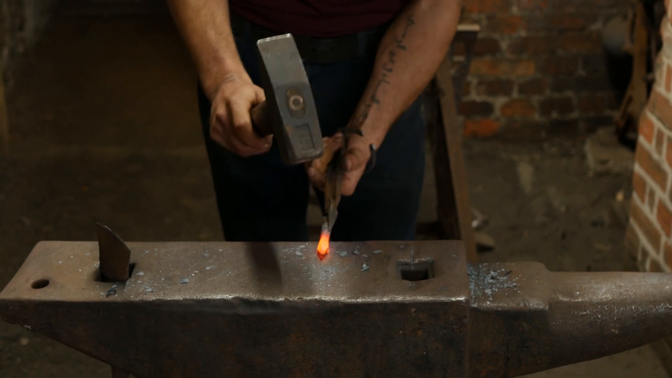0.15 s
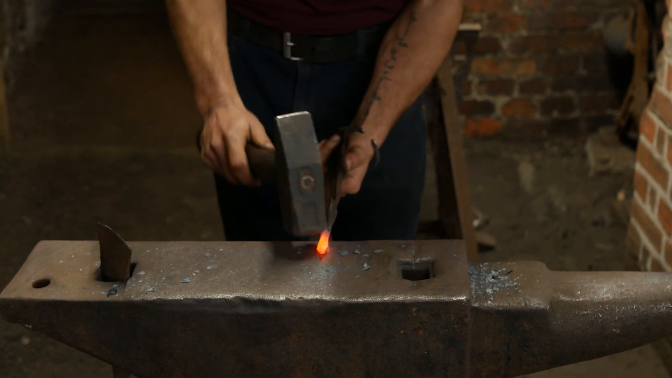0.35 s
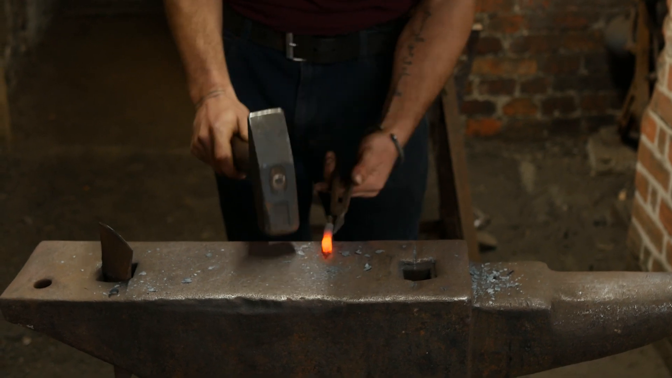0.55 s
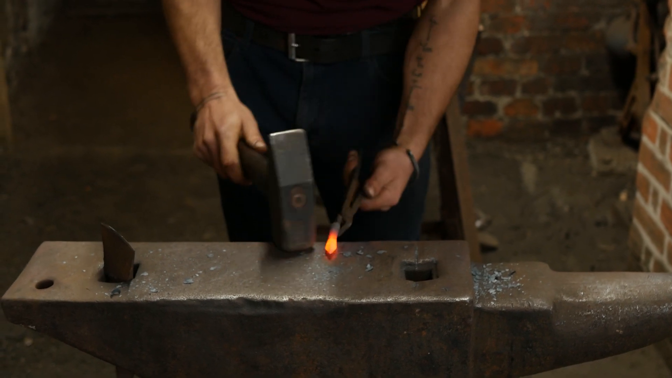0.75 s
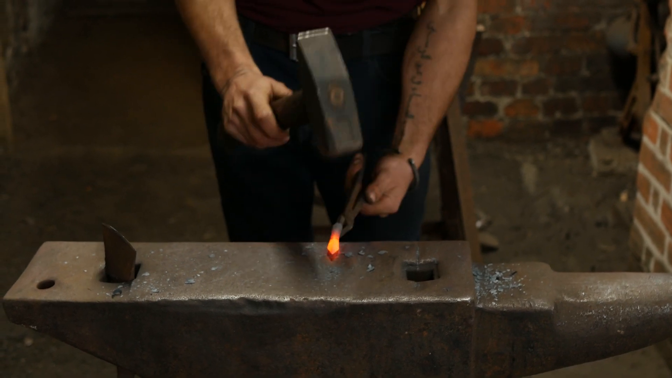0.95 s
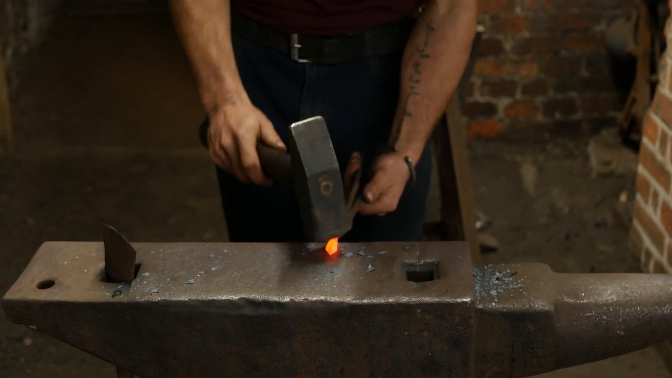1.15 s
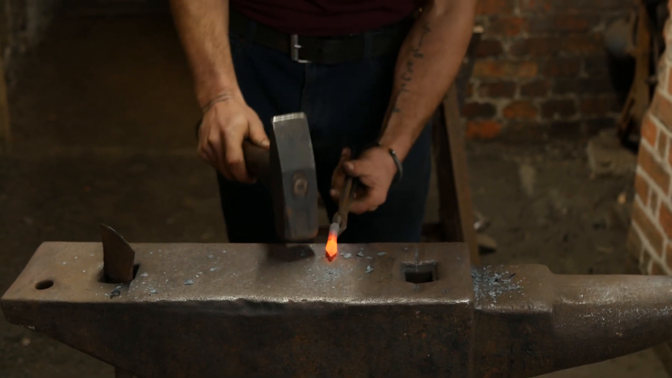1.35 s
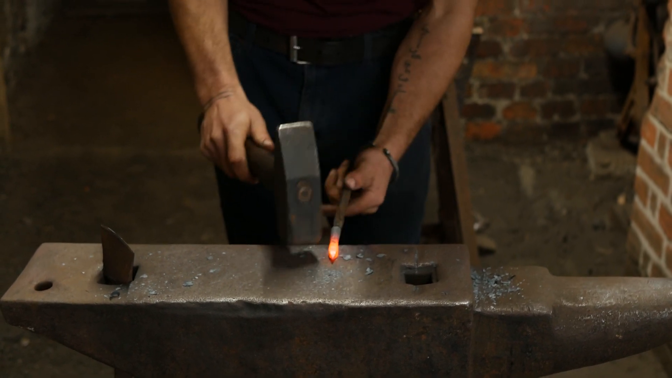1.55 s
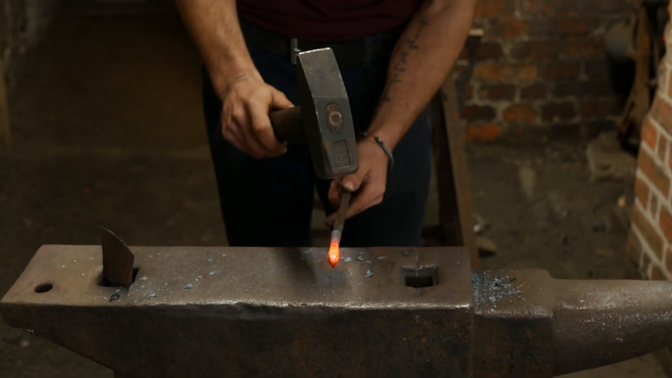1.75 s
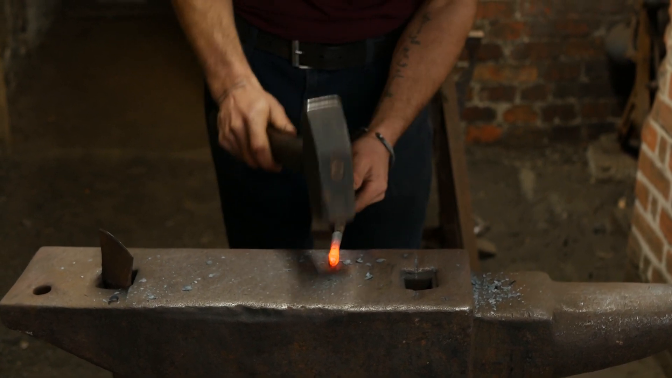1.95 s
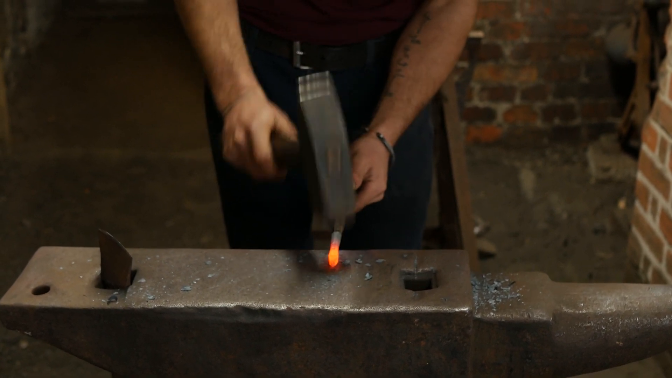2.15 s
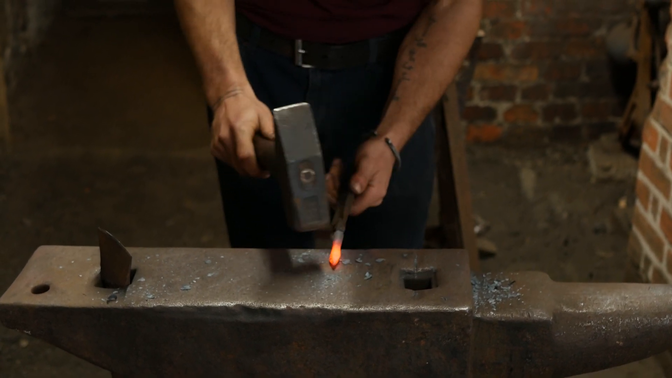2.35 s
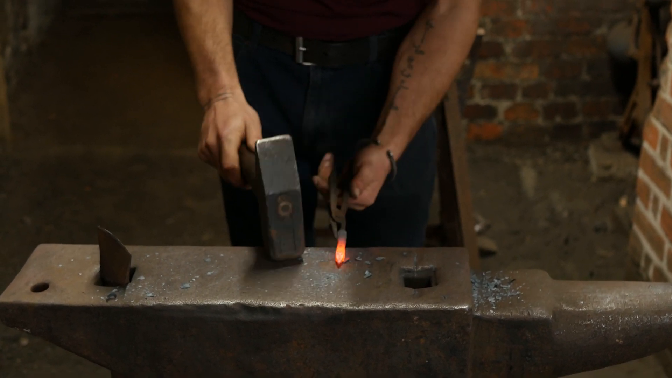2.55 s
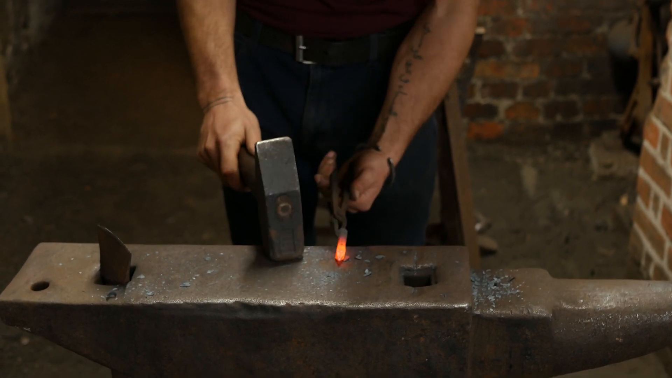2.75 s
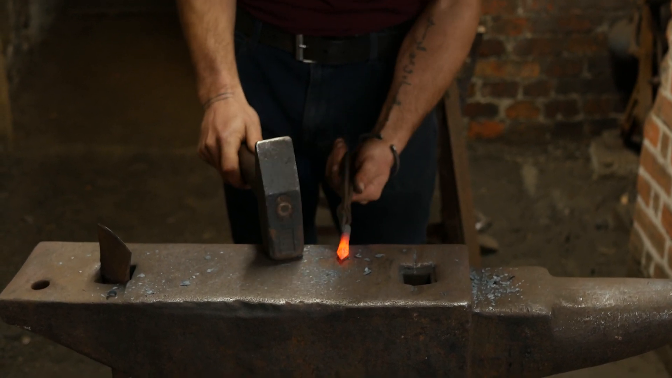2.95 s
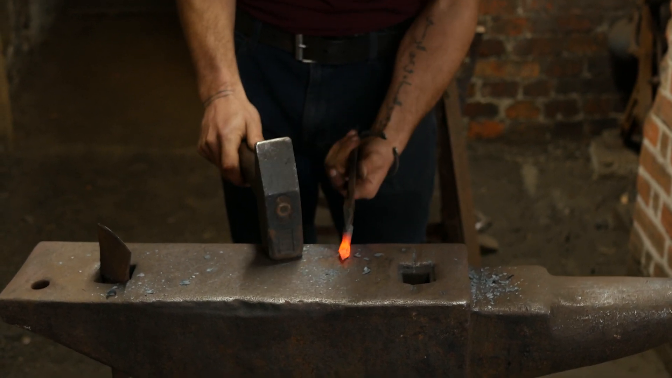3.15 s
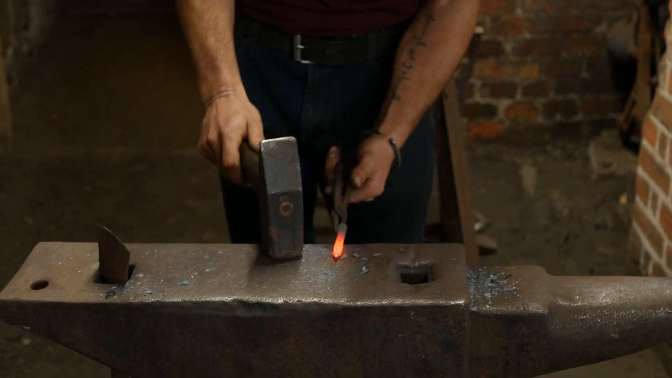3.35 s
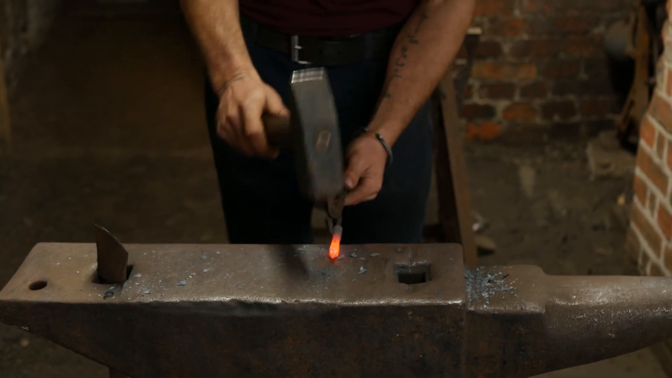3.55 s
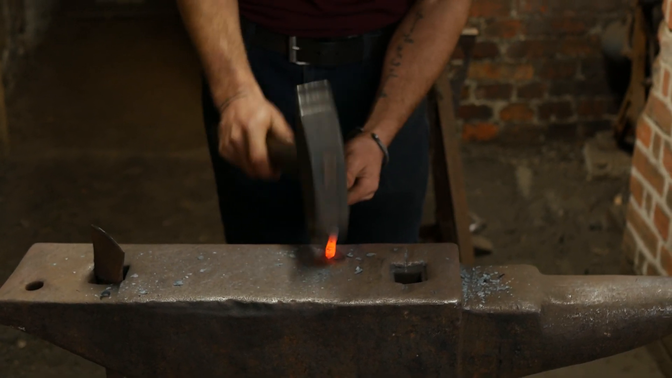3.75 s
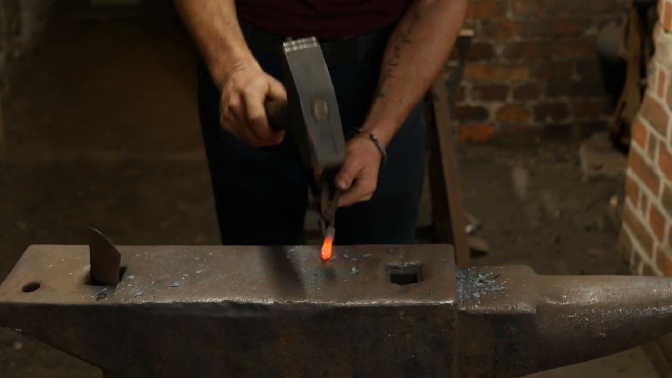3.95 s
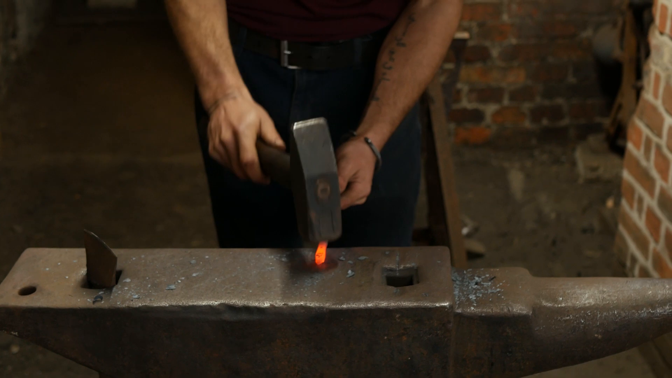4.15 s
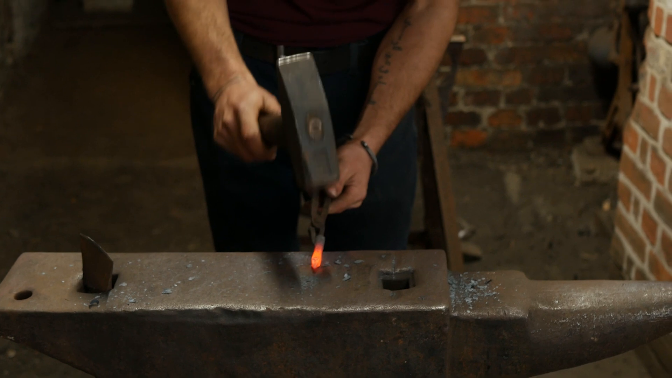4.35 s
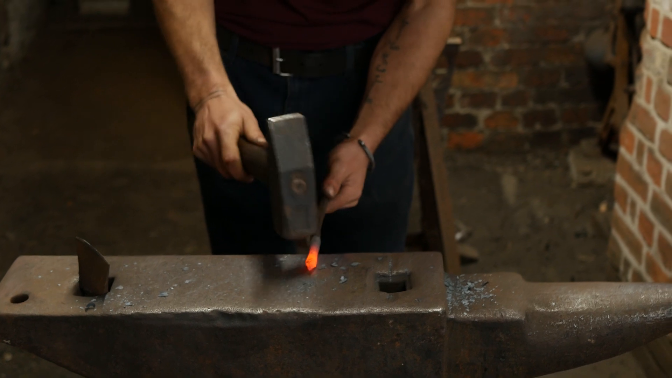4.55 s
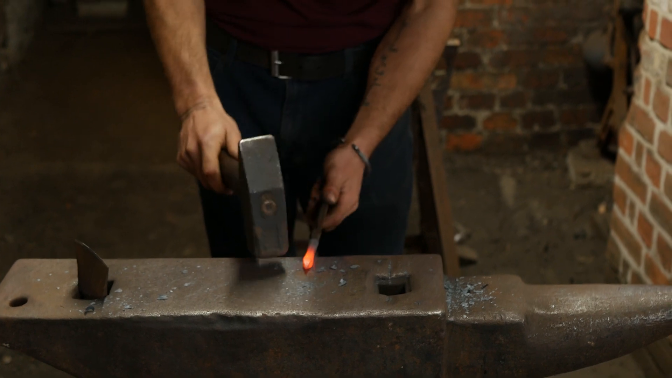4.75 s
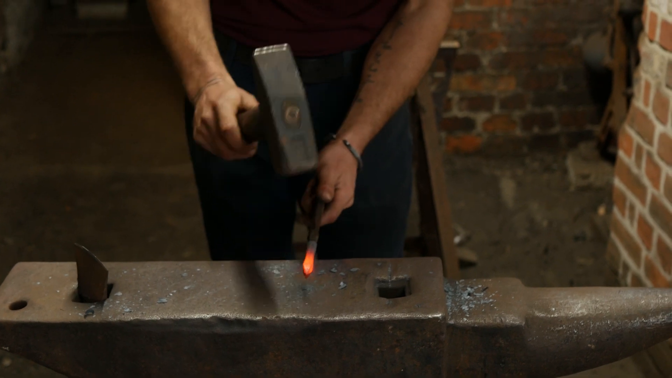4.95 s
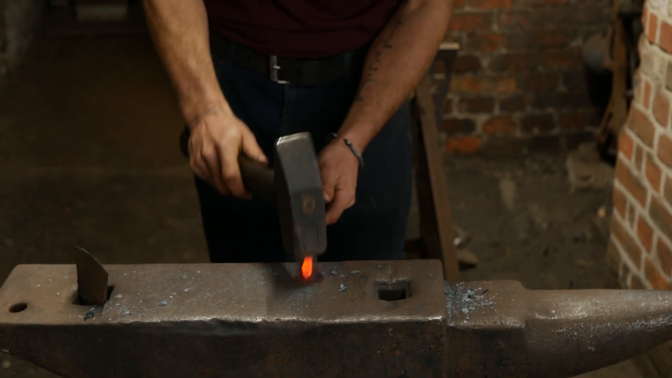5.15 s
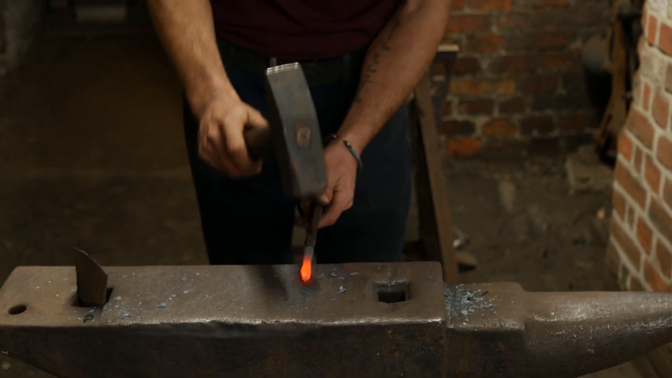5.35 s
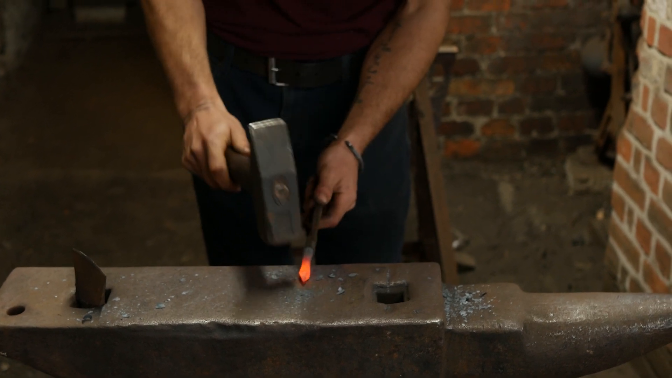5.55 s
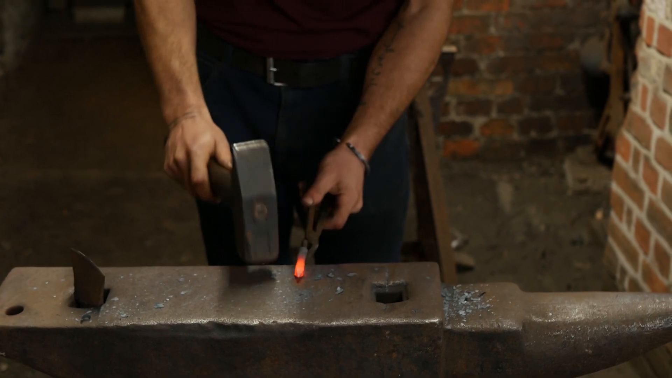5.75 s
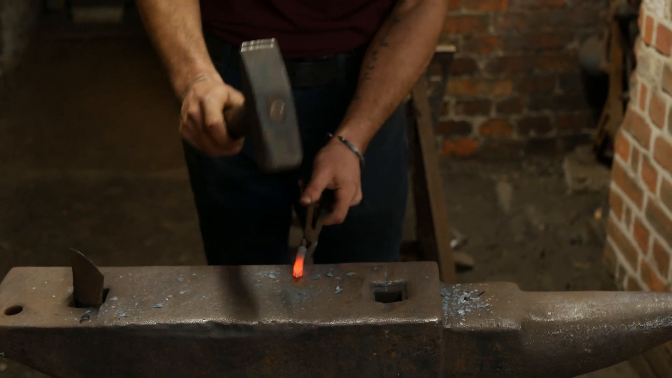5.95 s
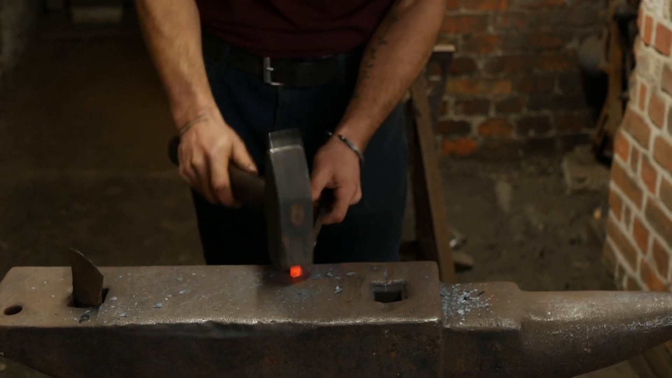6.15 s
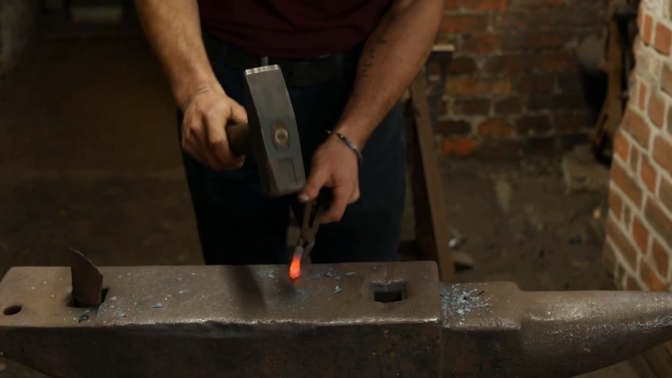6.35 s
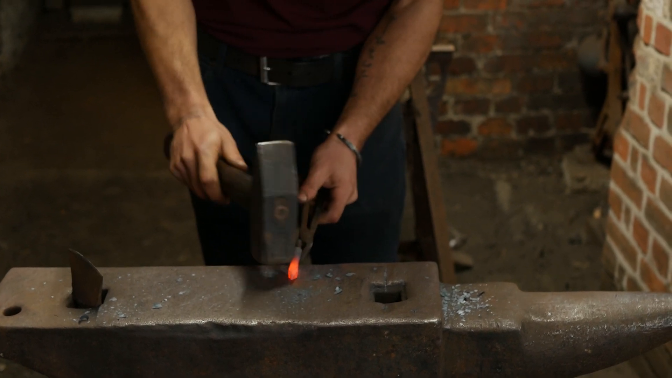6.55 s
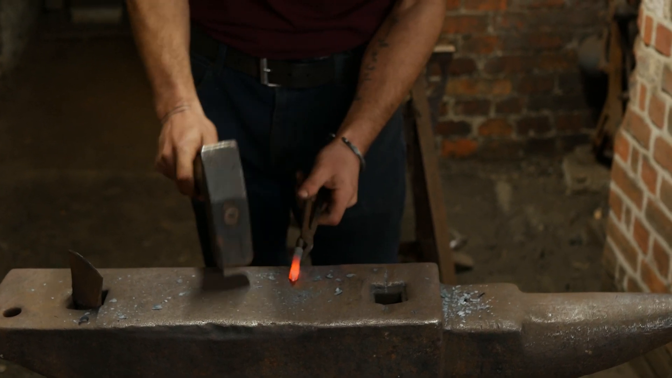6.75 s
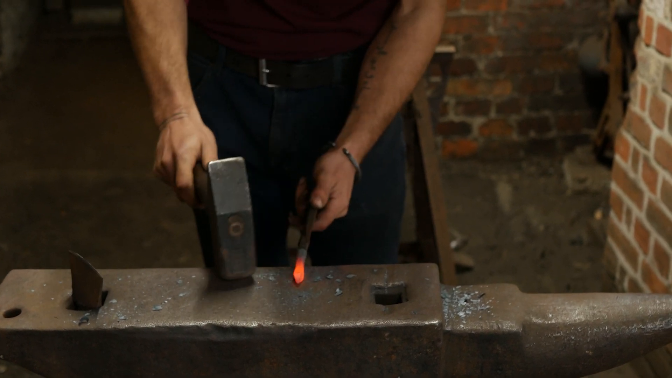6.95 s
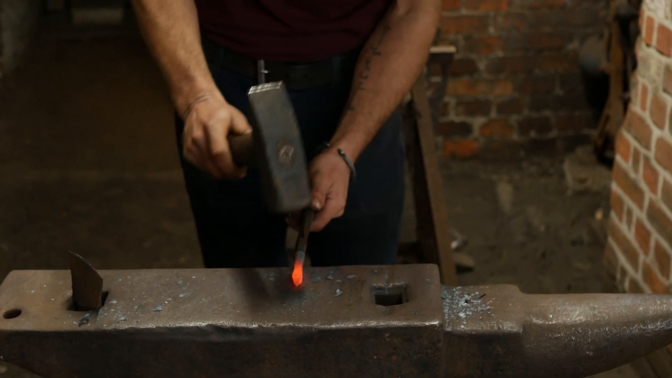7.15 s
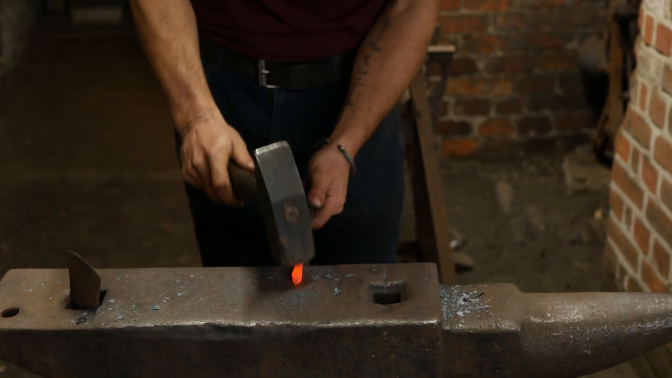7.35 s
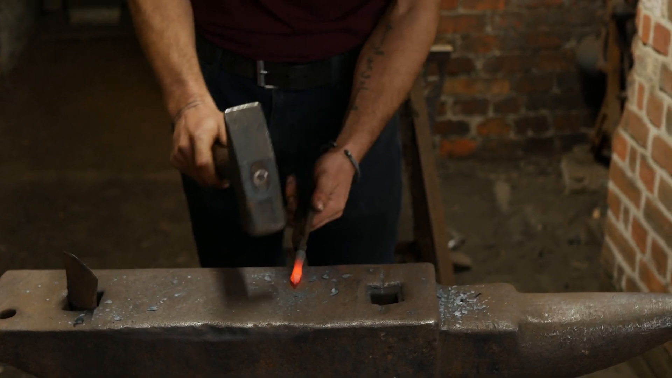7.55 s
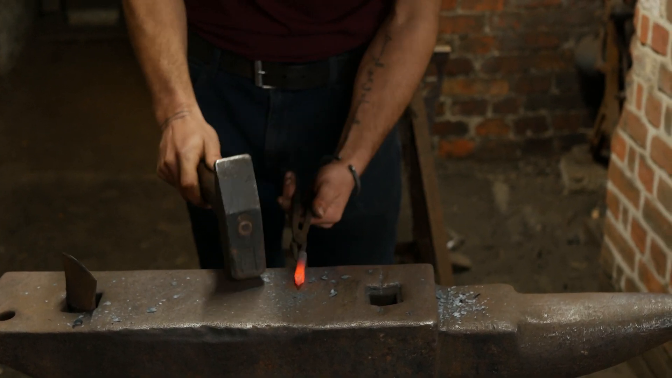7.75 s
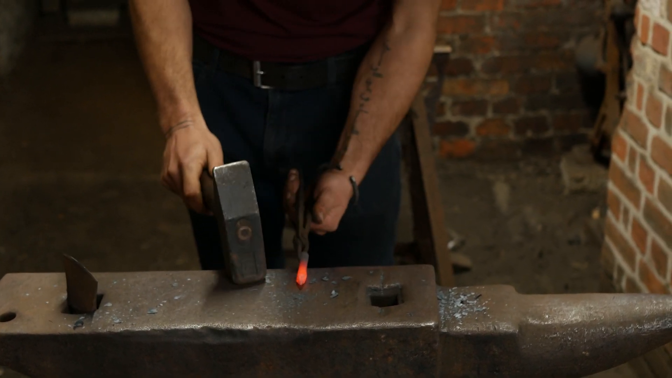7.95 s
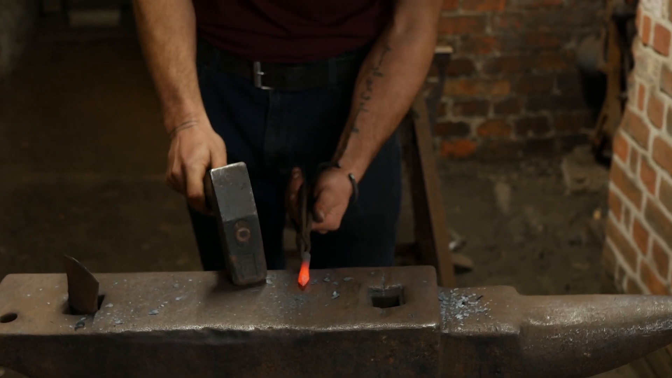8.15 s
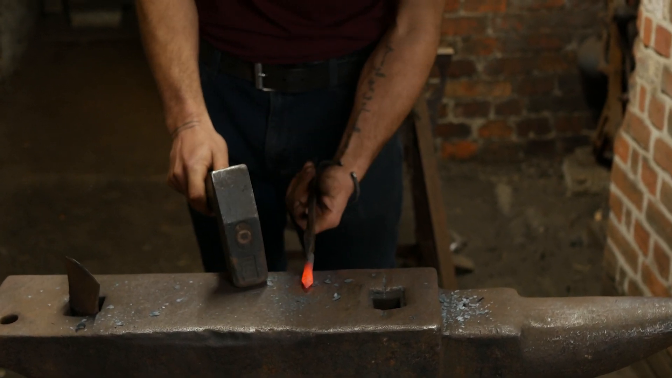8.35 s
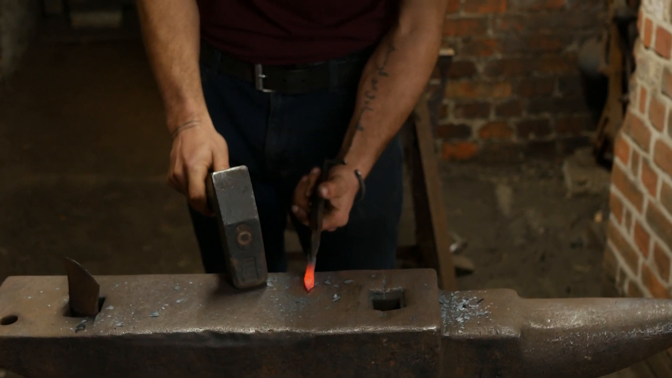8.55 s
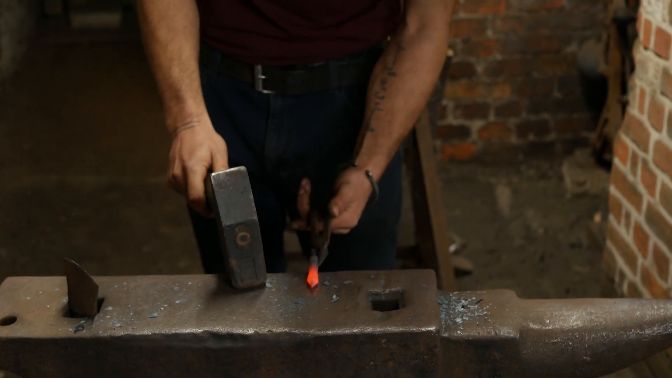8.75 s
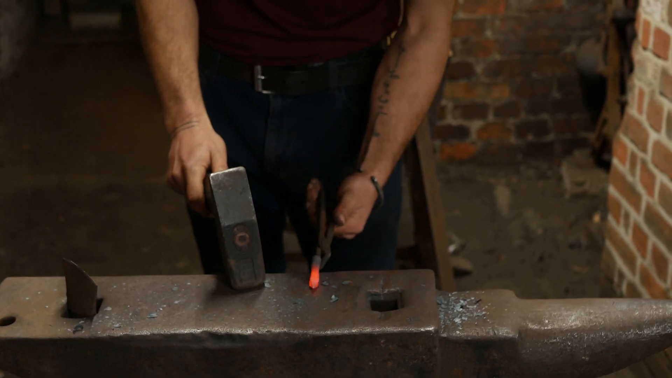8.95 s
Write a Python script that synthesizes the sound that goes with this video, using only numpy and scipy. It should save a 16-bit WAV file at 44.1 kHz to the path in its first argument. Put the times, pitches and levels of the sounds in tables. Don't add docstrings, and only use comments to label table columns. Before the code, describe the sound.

Hard, bright hammer blows ring on a steel anvil in steady rhythm, overloading the close microphone in a brick forge, with brief pauses.

```python
import sys
import numpy as np
from scipy import signal
from scipy.fft import rfft, irfft
from scipy.io import wavfile

SR = 44100
rng = np.random.default_rng(int(sys.argv[2]) if len(sys.argv) > 2 else 0)


def rack_gain(trim_db):
    fader = np.asarray(trim_db, float)
    return 10 ** (fader / 20)


def digitize_waveform(pressure):
    field = np.atleast_2d(pressure).T
    bounded = np.clip(field, -1, 1)
    quanta = np.round(bounded * 32767).astype(np.int16)
    wavfile.write(sys.argv[1], SR, quanta)


N = 400847

# (time [s], level [dB])
TRAFFIC_COLOUR = [(12, -45), (20, -14), (48, -2.5), (80, -14), (114, -6), (145, -13), (234, -8),
                  (304, -11.5), (342, -19), (501, -15.5), (668, -21), (1000, -14.5), (2540, -32),
                  (6000, -41), (7800, -66.5), (13200, -120)]
TRAFFIC_SWELL = [(0, -64), (1.2, -61.5), (3.4, -61.5), (3.9, -57.5), (5.2, -64.5), (7.3, -64.5), (8.3, -63),
                 (9.09, -57.5)]
# (frequency [Hz], level [dB per Hz])
RUSTLE_COLOUR = [(4000, -15), (5900, -10), (6300, -4), (7500, -4), (7900, -4.5), (11900, -3), (12400, -11),
                 (15500, -12), (16200, -36)]
# (time [s], length [s], added rustle [dB])
STIRS = [
    (2.583, 0.17, 5),
    (2.57, 1.7, 4.5),
    (7.706, 1.34, 7),
    (4.135, 0.11, 9),
    (7.88, 0.22, 4.5),
    (8.66, 0.67, 7),
]

# (time [s], lowest pitch [Hz], level [dB])
CHIRPS = [(1.48, 3080, -67.5), (1.72, 3100, -72.5), (1.866, 3000, -69), (1.98, 2920, -65.5),
          (7.674, 3220, -65.5), (7.80, 3110, -61), (7.912, 3050, -60), (8.043, 2880, -57.5),
          (8.183, 2820, -60)]
# (time [s], length [s], middle pitch [Hz], level [dB])
SLIDES = [(2.259, 0.12, 3100, -64), (2.563, 0.068, 3350, -67), (8.298, .04, 4630, -71),
          (8.327, 0.077, 3020, -56), (8.527, 0.043, 5430, -66), (8.558, 0.058, 3240, -58),
          (8.613, 0.076, 3140, -53), (8.715, .12, 2620, -59.5)]
# (frequency [Hz], level [dB per Hz])
HOARSENESS = [(20, 0), (250, 0), (500, -15), (900, -80)]

# (time [s], peak level [dB], pitch [Hz])
TICKS = [(2.6114, -61.5, 9400), (2.9442, -61.5, 6200), (3.1198, -67.5, 9810), (3.4285, -59, 7990),
         (3.48, -54, 7060), (3.6279, -52, 7210), (3.662, -53, 6270), (4.5685, -51, 6210),
         (7.9094, -55.5, 6584)]
# (frequency [Hz], level [dB per Hz])
TICK_HISS = [(3000, -29.0), (6500, 1.5), (12000, -1.5), (14000, -26.0)]

# (frequency [Hz], level [dB])
ROOM_T60 = [(120, 0.033), (400, 0.43), (800, 0.24), (1500, 0.19), (2500, 0.2), (4000, 0.14), (7000, 0.11),
            (14000, 0.053)]
ROOM_LEVEL = [(120, -20.5), (230, -12), (400, -14), (800, -13), (1500, -8), (2500, -14), (4000, -13),
              (8000, -7.5), (15000, -10.5)]

# (frequency [Hz], level [dB], t60 [s])
FLOOR = [(47, 1.5, 0.31), (59, 7, 0.79), (75.5, 2, 1)]
# (time [s], level [dB])
STEPS = [
    (3.62, -54),
    (8.78, -64.5),
]

# (time [s], weight driven through the iron [dB], steel meeting steel [dB],
# sharpness of the edge [dB], reach toward the heel [dB])
BLOWS = [(0.0995, 4, -5.5, 3, -17.5), (0.4477, 2.5, -3, -1, -15), (0.7856, -11, 3.5, -4.5, 11),
         (1.2686, -1, -16.5, 6.5, -12), (1.5646, -7.5, 4, -1.24, 12.5), (2.028, 1.5, -10.5, 2.5, -11),
         (2.3494, 1, 2, 4, 2), (3.936, 4.5, 2.5, 2, 5.5), (4.274, 3.5, 4, 2, 6.5), (4.601, 2, 4.5, 3.5, 6),
         (4.855, -1.44, 3, -7, 6), (5.2758, 2.5, 1.04, 4.5, -3.5), (5.6064, -1, 6.5, 4.5, 0.6),
         (5.8902, -6, 10, 0, 13), (6.3181, 1, 3, 0.24, -16.5), (6.6616, -2.5, -3.5, -1, -30),
         (6.9719, -9.5, 7, -7, 14.5), (7.0623, -11, -8, -53.5, 2)]
# (time [s], knock level [dB], push into the stump [dB], face pitch [Hz])
RESTS = [
    (2.75, -38.5, -40, 2000),
    (7.484, -5.5, -23, 3930),
    (7.9947, -44.5, -38, 2040),
]
BLOW_ANSWER = {"face": (-3.4, 0.31, .65, -0.14, -0.017), "iron": (-6.5, 0.55, 0.04, 0.29, -0.1),
               "crack": (-19, 0, 0, 1, 0), "stump": (-22, 0.5, 0.58, -0.22, -0.1633),
               "bending": (-14.5, 1, 0.27, 0, 0), "twist": (-26, 0, 1, 0, 0),
               "second": (-19, -0.18, 0.6, -0.08, -0.01), "heel": (-34.5, 0, 0, 0, 1),
               "overtones": (-60, -0.2, 0.5, 1.32, 0), "floor": (-48, 1.06, 0.5, 0.5, -0.14),
               "rocking": (-30, 0.25, -0.63, 0.17, 0.16)}
REST_ANSWER = {"face": (0, 1, 0), "iron": (-24, 0, 0.35), "crack": (-11.5, 1.1, 0), "stump": (0, 0, 1),
               "bending": (-28.5, 0.55, 0), "twist": (-35, .7, 0), "second": (-30.5, .7, 0),
               "heel": (-64.5, 0.4, 0), "overtones": (-63, .8, 0), "floor": (-14.5, 0, 1.2),
               "rocking": (1.5, 0, 0.82)}
# (edge over steel [dB], pitch [Hz])
FACE_PITCH = [(1.5, 2210), (7, 1200)]

# (frequency [Hz], level [dB], t60 [s])
ROCKING = [(303, -13, .2), (345, -15, .18), (420, -4, .2), (510, -6, .2)]
BENDING = [(1254, -8, .25), (1332, 1.5, .255)]
TWIST = [(1752, -3, .22), (2020, 0, .25), (2295, -9, .18), (2999, -6, .26), (3100, -11, .16)]
SECOND_BENDING = [(2496, -13, .36), (2599, 0, .33)]
HEEL = [(3471, 0, .48)]
# (frequency [Hz], level [dB])
OVERTONES = [(4016, -9), (4210, -9), (4317, -3), (4382, -7), (5146, 2), (5696, -7), (6944, -3), (7267, 1),
             (7494, -5), (7590, -6), (8140, -4), (8236, -6), (8840, -7), (9227, -2), (9636, -4), (9991, 4),
             (10497, 0), (11585, -8), (12500, -10), (13329, -6)]
# (time [s], bending, twist, second, heel, overtones [dB])
EARLIER_BLOW = (-.3, -60, -70, -38, -24, -90)

# (share of face pitch [ratio], level [dB], t60 [s])
FACE = [(1.0, 1, 0.012), (.55, -4, 0.0034), (1.45, -11, 0.0063), (1.6, -11.5, 0.0066)]
# (frequency [Hz], level [dB], t60 [s])
IRON = [(855, -3, 0.029), (560, -22, 0.0022), (1704, -8, 0.025)]
STUMP = [(230, -15, .05), (320, -11, 0.025), (422, 3, 0.07), (510, -5, .05), (640, -6, .03)]
# (frequency [Hz], level [dB per Hz])
CRACK_COLOUR = [(1760, -24.5), (3000, 1), (5230, -3.5), (5820, 2.5), (7060, -9), (9190, -3), (15000, -16.5),
                (16500, -23.5)]


def at_hz(points, hz):
    table = np.array(points)
    return np.interp(np.log(hz), np.log(table[:, 0]), table[:, 1])


def clicks(seconds, sizes):
    out = np.full(N, 1e-18)
    out[np.round(np.asarray(seconds) * SR).astype(int)] = sizes
    return out


def die_away(x, t60):
    return signal.lfilter([1], [1, -rack_gain(-60 / (t60 * SR))], x)


def ring(x, hz, t60):
    radius = rack_gain(-60 / (t60 * SR))
    turn = 2 * np.pi * hz / SR
    return signal.lfilter([0, np.sin(turn)], [1, -2 * radius * np.cos(turn), radius ** 2], x)


def since_blow(seconds):
    t = np.arange(N) / SR
    last = np.maximum(np.searchsorted(seconds, t) - 1, 0)
    return last, t - seconds[last]


def strike(modes, seconds, db, spread_db, pitch=1):
    luck = rng.standard_normal((len(seconds), len(modes)))
    pitches = pitch * np.ones(len(seconds))
    last, since = since_blow(seconds)
    since = np.maximum(since, 0)
    out = np.zeros(N)
    for k, (hz, level_db, t60) in enumerate(modes):
        live = since < 1.15 * t60
        blow, age = last[live], since[live]
        start_db = (db + level_db + spread_db * luck[:, k])[blow]
        size = rack_gain(start_db - 60 * age / t60)
        out[live] -= size * np.sin(2 * np.pi * hz * pitches[blow] * age)
    return out


def coloured(spectrum):
    hz = np.maximum(np.fft.rfftfreq(N, 1 / SR), 1)
    x = irfft(rfft(rng.standard_normal(N)) * rack_gain(at_hz(spectrum, hz)), N)
    return x / x.std()


def contacts(*parts):
    blows, rests = np.array(BLOWS), np.array(RESTS)
    bite_db, bite_hz = np.transpose(FACE_PITCH)
    edge_over_steel = blows[:, 3] - blows[:, 2]
    s = np.r_[blows[:, 0], rests[:, 0]]
    hz = np.r_[np.interp(edge_over_steel, bite_db, bite_hz), rests[:, 3]]
    levels = []
    for part in parts:
        blow, rest = BLOW_ANSWER[part], REST_ANSWER[part]
        blow_db = blow[0] + blows[:, 1:] @ blow[1:]
        rest_db = rest[0] + rests[:, 1:3] @ rest[1:]
        levels.append(np.r_[blow_db, rest_db])
    return np.array([s, hz, *levels])[:, np.argsort(s)]


def air():
    rustle_db, edge_s = -79, 0.09
    t = np.arange(N) / SR
    traffic = coloured(TRAFFIC_COLOUR) * rack_gain(np.interp(t, *np.transpose(TRAFFIC_SWELL)) + 2.5)
    stir_db = np.zeros(N)
    for s, length, db in STIRS:
        stir_db += db * np.clip(np.minimum(t - s, s + length - t) / edge_s, 0, 1)
    return traffic + coloured(RUSTLE_COLOUR) * rack_gain(rustle_db + stir_db)


def bird():
    out, hoarse = np.zeros(N), coloured(HOARSENESS)
    notes = [(s, 0.058, hz, db, 1.14, 1.48) for s, hz, db in CHIRPS]
    notes += [(*slide, 1.19, 0.71) for slide in SLIDES]
    for s, length, middle_hz, db, start, end in notes:
        i = int(s * SR)
        u = np.arange(int(length * SR)) / (length * SR)
        hz = middle_hz * np.interp(u, [0, 0.6, 1], [start, 1, end])
        swell = rack_gain(db) * np.sqrt(np.sin(np.pi * u))
        whistle = swell * np.sin(2 * np.pi * np.cumsum(hz) / SR)
        out[i:i + len(u)] += whistle * (1 + 1.1 * hoarse[i:i + len(u)])
    t = np.arange(SR // 2) / SR
    yard = rng.standard_normal(len(t)) * rack_gain(-29 - 60 * t / 0.27)
    return 0.56 * out + signal.fftconvolve(out, yard)[:N]


def ticks():
    out, hiss = np.zeros(N), coloured(TICK_HISS)
    for s, db, hz in TICKS:
        click = clicks([s], rack_gain(db))
        out += 0.62 * ring(click, hz, 0.07)
        out += 0.5 * hiss * die_away(click, 0.085)
    return out


def room(x):
    out, white = 0, rng.standard_normal((2, N))
    edges = 100 * 2 ** np.arange(0, 7.5, 1 / 3)
    build = np.exp(-1 / (0.00043 * SR))
    for k, (low, high) in enumerate(zip(edges, edges[1:])):
        band = signal.butter(2, [low, high], "band", fs=SR, output="sos")
        given, noise = signal.sosfilt(band, [x, white[k % 2]])
        keep = rack_gain(-120 / (at_hz(ROOM_T60, low) * SR))
        poles = np.convolve([1, -keep], [1, -build])
        stored = signal.lfilter([(1 - keep) * (1 - build)], poles, given ** 2)
        out = out + rack_gain(at_hz(ROOM_LEVEL, low)) * np.sqrt(np.abs(stored)) * noise / noise.std()
    return out


def thuds():
    s, _, db = contacts("floor")
    s, db = np.c_[[s, db], np.transpose(STEPS)]
    soften = signal.butter(2, 75, fs=SR, output="sos")
    push = signal.sosfilt(soften, clicks(s + 0.01, rack_gain(db)))
    return sum(rack_gain(level_db) * ring(push, hz, t60) for hz, level_db, t60 in FLOOR)


def anvil(ring_db=0.7):
    s, _, *levels = contacts("bending", "twist", "second", "heel", "overtones")
    s, *fed_db, overtones_db = np.c_[EARLIER_BLOW, [s, *levels]]
    families = BENDING, TWIST, SECOND_BENDING, HEEL
    rings = sum(strike(modes, s, db + ring_db, spread_db=0.5) for modes, db in zip(families, fed_db))
    overtones = [(hz, db, 0.175 * (5000 / hz) ** 0.3) for hz, db in OVERTONES]
    rings += strike(overtones, s, overtones_db + 21, spread_db=4)
    held = [(hz, db, 0.7 * t60) for hz, db, t60 in overtones[::3]]
    grip = rng.uniform(0.88, 1.12, len(s))
    rings += strike(held, s, overtones_db + 22, spread_db=5, pitch=grip)
    _, since = since_blow(s)
    return rings * (1 - 0.75 * np.exp(-since / 0.01))


def knocks():
    parts = "face", "iron", "crack", "stump", "rocking"
    s, face_hz, face_db, iron_db, crack_db, stump_db, rocking_db = contacts(*parts)
    burst = die_away(clicks(s, rack_gain(crack_db + 5)), 0.025)
    burst += die_away(clicks(s, rack_gain(crack_db + 6)), 0.0014)
    face = strike(FACE, s, face_db + 3, spread_db=1.5, pitch=face_hz)
    iron = strike(IRON, s, iron_db + 2, spread_db=1.5)
    stump = strike(STUMP, s + 0.003, stump_db + 8, spread_db=2.5)
    stump += strike(ROCKING, s + 0.0033, rocking_db + 4.5, spread_db=3)
    knock = face + iron + stump + burst * coloured(CRACK_COLOUR)
    no_bass = signal.butter(3, 310, "high", fs=SR, output="sos")
    return signal.sosfilt(no_bass, knock)


def scene():
    knock = knocks()
    quiet = air() + bird() + ticks()
    return (quiet + rack_gain(5) * room(knock) + thuds() + anvil() + knock)[None]


def gain_control(x, above_db, share, release_db_per_s, attack_s):
    climb = release_db_per_s * np.arange(N) / SR
    excess = share * np.maximum(20 * np.log10(np.abs(x) + 1e-9) - above_db, 0)
    held = np.maximum.accumulate(excess + climb, axis=-1) - climb
    keep = np.exp(-1 / (attack_s * SR))
    return x * rack_gain(-signal.lfilter([1 - keep], [1, -keep], held))


def roll_off(x):
    return signal.sosfilt(signal.butter(12, 16840, fs=SR, output="sos"), x)


def record(dry):
    held = gain_control(dry, above_db=-17.5, share=0.33, release_db_per_s=90.0, attack_s=0.004)
    overloaded = np.clip(held, -0.97, 0.97)
    top_cut = signal.cheby2(8, 40, 16900, fs=SR, output="sos")
    mix = np.clip(signal.sosfilt(top_cut, overloaded), -1, 1)
    return roll_off(mix)


dry = scene()
out = record(dry)
digitize_waveform(out)
```